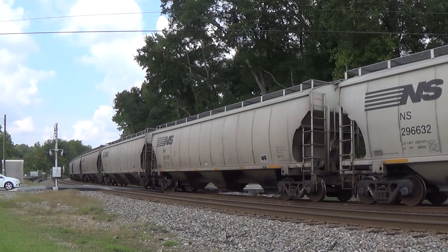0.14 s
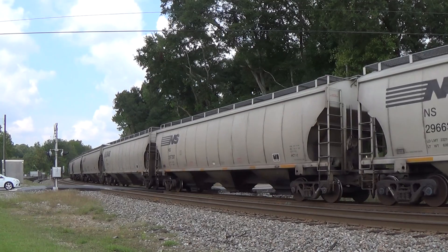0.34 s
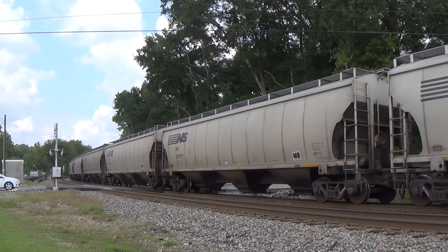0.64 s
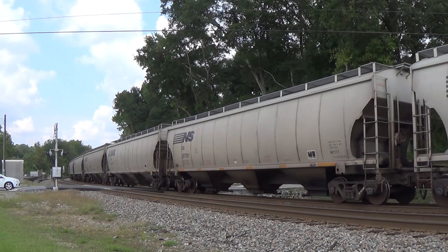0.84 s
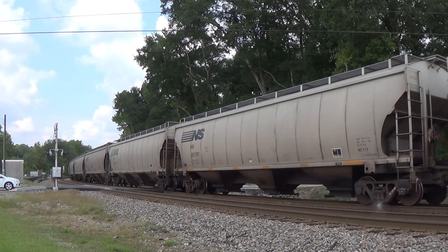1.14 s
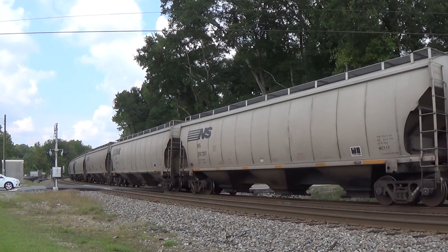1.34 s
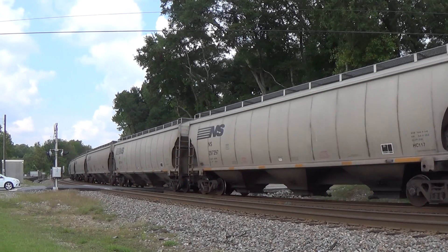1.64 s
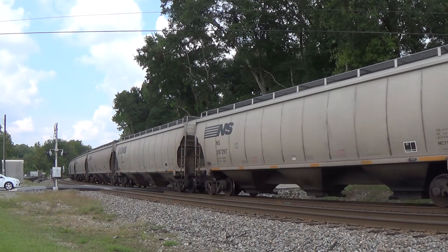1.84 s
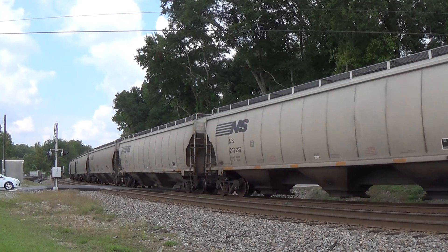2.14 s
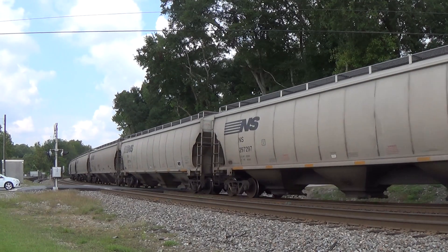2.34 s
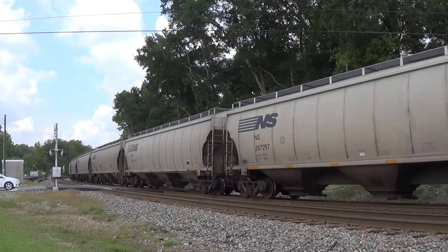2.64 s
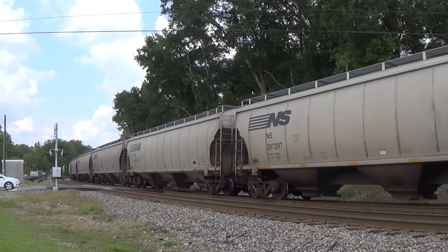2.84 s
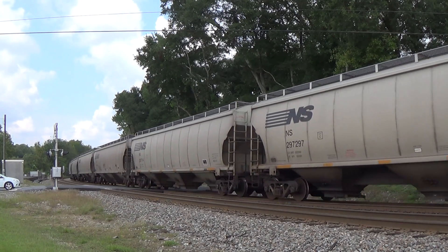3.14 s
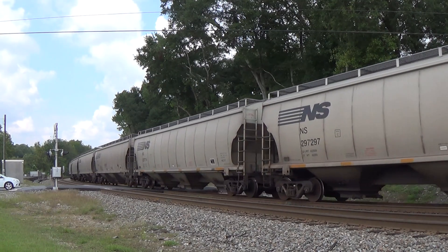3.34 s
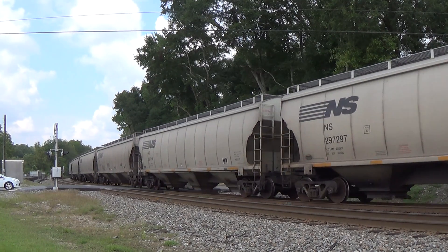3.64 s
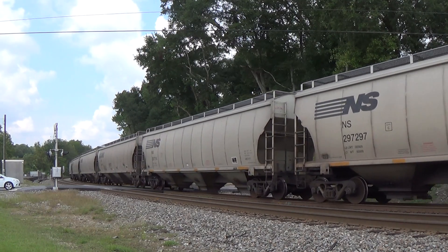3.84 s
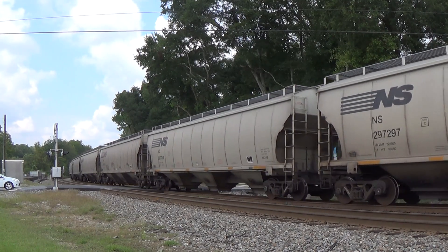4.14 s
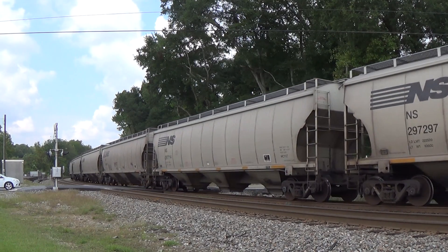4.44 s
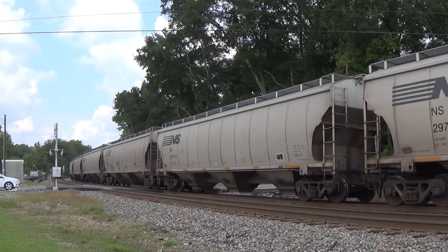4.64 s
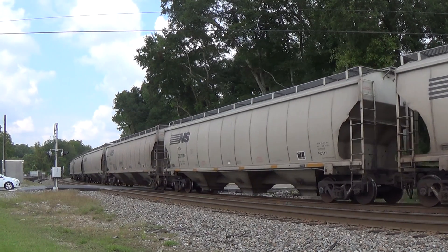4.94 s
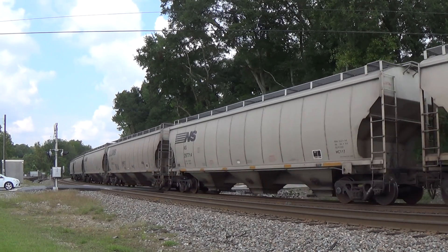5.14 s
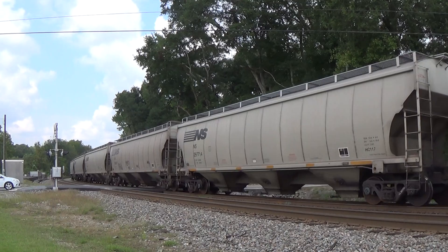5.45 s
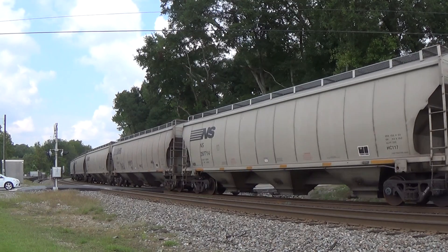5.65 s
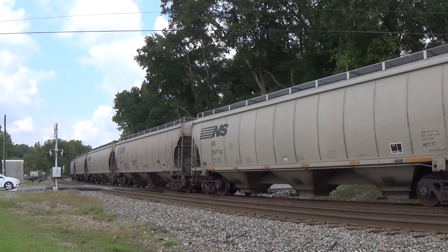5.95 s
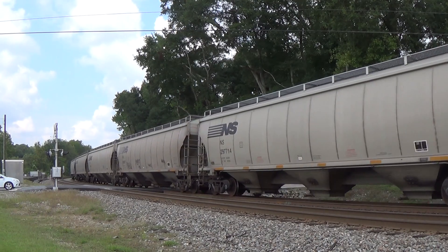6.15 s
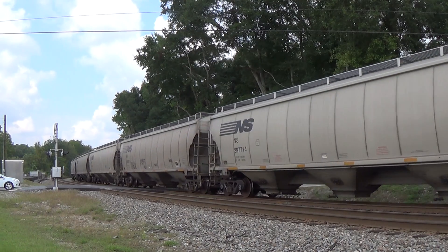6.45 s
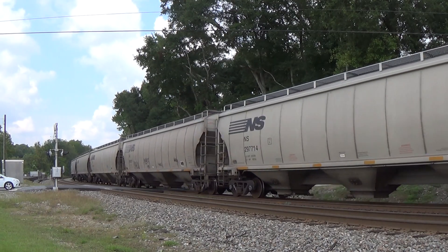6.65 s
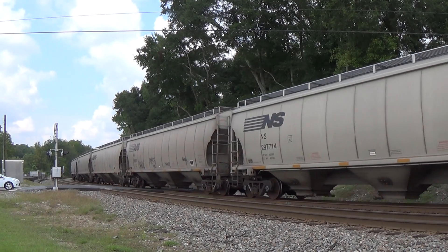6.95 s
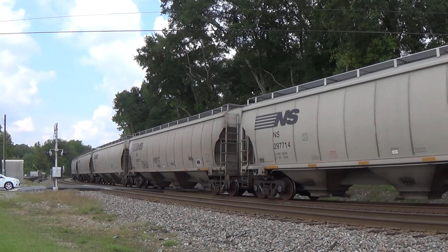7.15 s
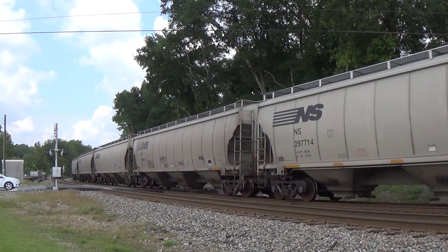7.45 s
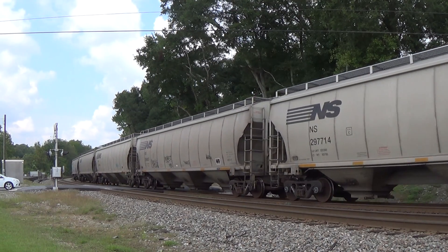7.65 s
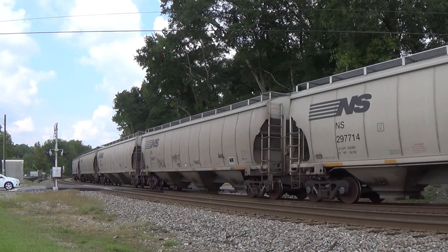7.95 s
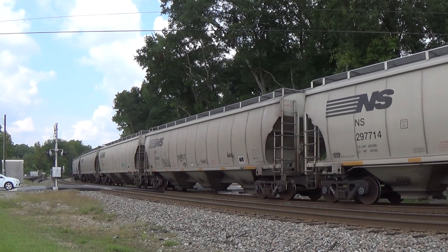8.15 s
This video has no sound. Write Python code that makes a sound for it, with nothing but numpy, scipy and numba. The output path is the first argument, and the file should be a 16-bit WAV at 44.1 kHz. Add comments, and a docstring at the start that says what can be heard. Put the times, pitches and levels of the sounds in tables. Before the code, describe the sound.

Heard from about ten metres off an outdoor track, freight cars pass slowly with shrill, overlapping wheel squeals and a steady metallic grinding hiss. Underneath, the car bodies rumble and the rail hums faintly. Irregular thuds with short rattles join in as wheels cross rail joints, growing heavier while the squealing eases. The rolling rumble builds toward the end.

```python
"""A slow freight train of hopper cars passes, drifting to the right. From the start, flanges grind on
the rail and ring the steel wheels, and single wheel modes break into squeals over rumbling car bodies
and a faint rail hum. From 2.2 s the cars knock over the rail joints. At 3 s the grinding truck goes by,
ten metres away, its ringing and squeals gliding down in pitch. Then the squeals thin out, the knocks
hit harder until the last at 7.2 s, and the rumble swells to the end."""
import sys
import numpy as np
from scipy import signal
from scipy.fft import rfft, irfft, next_fast_len
from scipy.io import wavfile
from scipy.ndimage import uniform_filter1d
from numba import njit

SR = 44100
rng = np.random.default_rng(int(sys.argv[2]) if len(sys.argv) > 2 else 0)


def master(y):
    """Save y as 16-bit WAV."""
    cut = np.clip(np.atleast_2d(y).T, -1, 1)
    pcm = np.round(cut * 32767)  # scale
    wavfile.write(sys.argv[1], SR, pcm.astype(np.int16))


N = 366030
TIME = np.arange(N) / SR
STAGES_S = (1., 3.7, 6.8)  # the grinding truck approaches, passes, recedes


def undb(db):
    """dB to gain."""
    return 10 ** (np.asarray(db) / 20)


def unit(x):
    """Scale to rms 1."""
    return x / np.sqrt(np.mean(x ** 2))


def automation(table):
    """One curve for each column after the time column."""
    times, *columns = np.transpose(table)
    return [np.interp(TIME, times, column) for column in columns]


def staged(values):
    """A curve through one value for each stage of the pass."""
    return np.interp(TIME, STAGES_S, values)


def on_hz(table, hz):
    """Read (frequency, value) points on a log axis."""
    freqs, values = np.transpose(table)
    return np.interp(np.log(hz + 1), np.log(freqs), values)


def shape(x, gain):
    """Filter by a gain that is a function of Hz."""
    size = next_fast_len(N)
    return irfft(rfft(x, size) * gain(np.arange(size // 2 + 1) * SR / size), size)[..., :N]


def eq(x, table):
    """Filter by a curve of (f/Hz, level/dB) points."""
    return shape(x, lambda hz: undb(on_hz(table, hz)))


def split(x, edges_hz):
    """Crossover: bands that add up to x."""
    lows = [shape(x, lambda hz: 1 / (1 + (hz / edge) ** 8)) for edge in edges_hz]
    return np.diff([0 * x] + lows + [x], axis=0)


def wander(rate_hz):
    """Smooth random modulator with a spread near 1."""
    hold = int(SR / rate_hz)
    steps = np.repeat(rng.standard_normal(N // hold + 1), hold)
    return 0.93 * uniform_filter1d(uniform_filter1d(steps, hold), hold)[:N]


@njit
def resonator(x, hz, width_hz):
    """State-variable band-pass with a slowly moving centre and width, gain 1 at the centre."""
    y = np.empty(len(x))
    band_state, low_state, tuning, damping = 0., 0., 0., 0.
    for i in range(len(x)):
        if i % 64 == 0:
            tuning, damping = np.tan(np.pi * hz[i] / SR), width_hz[i] / hz[i]
        band = (band_state + tuning * (x[i] - low_state)) / (1 + tuning * (tuning + damping))
        band_state = 2 * band - band_state
        low_state += 2 * tuning * band
        y[i] = damping * band
    return y


def ring(x, modes):
    """Drive a bank of fixed resonances with x."""
    return sum(undb(db) * resonator(x, np.full(N, float(hz)), np.full(N, float(width)))
               for hz, width, db in modes)


def doppler(speed_m_s=4., nearest_s=3., nearest_m=10., sound_m_s=343.):
    """Pitch ratio of the truck rolling by on a straight track."""
    along_m = speed_m_s * (TIME - nearest_s)
    return 1 - speed_m_s / sound_m_s * along_m / np.hypot(along_m, nearest_m)


# Wheel modes at rest: f/Hz
WHEEL_HZ = [964.0, 1568.0, 1944.0, 2208.0, 2572.0, 2752.0, 3348.0, 3544.0, 3860.0, 3980.0, 4484.0, 5336.0,
            5452.0, 5728.0, 6052.0, 6268.0, 6420.0, 6900.0, 7200.0, 7388.0, 8116.0, 8364.0, 9032.0, 9336.0,
            9924.0, 10312.0, 10800.0, 11264.0, 11696.0, 12424.0]
# Their balance, a row a mode: approaching level/dB, passing level/dB, receding level/dB
WHEEL_DB = [(-56, -50, -63), (-43.5, -43.5, -47.5), (-41, -43.5, -43), (-39.5, -35.5, -43),
            (-41.5, -45, -43.5), (-38.5, -36, -39.5), (-43, -39, -45.5), (-38.5, -43.5, -50.5),
            (-37, -40.5, -59), (-42.5, -39.5, -44), (-35, -36.5, -42.5), (-41, -42.5, -51),
            (-37.5, -36.5, -42.5), (-42, -39, -59), (-41, -42, -49), (-41, -38, -57), (-34, -38.5, -42),
            (-54, -42, -70), (-40.5, -34, -44.5), (-31, -35.5, -43), (-33, -41.5, -39), (-31.5, -55, -42),
            (-32, -45, -38.5), (-28, -59, -43), (-34, -42.5, -39), (-35.5, -44, -46), (-39, -35.5, -41.5),
            (-33, -67, -43), (-59, -33.5, -48), (-55, -31.5, -42)]


def wheel_ring(glide, flicker_db=3.5, rub_db=(2.5, -2, 4), width_at_4k_hz=(40., 38., 55.)):
    """Rubbing flanges drive every wheel mode; each catches and lets go on its own."""
    tones = 0
    for hz, levels_db in zip(WHEEL_HZ, WHEEL_DB):
        # higher modes lose energy faster; late in the pass more wheels share and widen each mode
        width = staged(width_at_4k_hz) * (hz / 4000) ** 0.4
        mode = resonator(rng.standard_normal(N), hz * glide, width)
        mode /= np.sqrt(np.pi * width / SR)  # make up the power lost in the band-pass
        tilt = (hz / 4000) ** 0.08
        tones += undb(staged(levels_db) + flicker_db * wander(14)) * tilt * mode
    # below the first radial mode the wheel radiates poorly
    return undb(staged(rub_db)) * shape(tones, lambda hz: hz ** 6 / (hz ** 6 + 1030. ** 6))


def fittings(count=220, lift_db=8., width_hz=45.):
    """Many small steel parts resonate at random pitches: their gain as a function of Hz."""
    centres = rng.uniform(1500, 16000, count)
    heights = undb(lift_db * rng.random(count))
    grid = np.arange(0, SR / 2, 10.)
    comb = 1 + sum(height / (1 + (2 * (grid - centre) / width_hz) ** 2)
                   for centre, height in zip(centres, heights))
    return lambda hz: np.interp(hz, grid, comb)


# Tone of the hiss: f/Hz, level/dB
HISS_EQ = [(1100, -23), (1500, -6), (1700, -0.5), (2300, -2.5), (3200, 0), (5000, -2), (9000, -1.5),
           (12000, 2), (14000, -3), (16000, -8)]
# Its band faders: t/s, level/dB below 5 kHz, level/dB at 5-10 kHz, level/dB above 10 kHz
HISS_FADERS = [(0.0, -27, -23, -24.5), (1.0, -26.5, -26.5, -25), (1.9, -25, -27, -31), (2.6, -27, -26, -32),
               (3.0, -29, -30, -30), (3.75, -27.5, -28.5, -26), (4.3, -27, -27, -28),
               (5.45, -23.5, -24, -28), (6.3, -26.5, -26.5, -29), (7.2, -25, -25, -27),
               (8.3, -29.5, -23.5, -27)]


def flange_hiss(steel_colour, trim_db=-5.):
    """Rough contact of flange and rail hisses, coloured by the steel fittings."""
    hiss = shape(rng.standard_normal(N), lambda hz: undb(on_hz(HISS_EQ, hz)) * steel_colour(hz))
    bands = split(hiss, edges_hz=(5000, 10000))
    return sum(undb(db + trim_db) * unit(band) for db, band in zip(automation(HISS_FADERS), bands))


def chirps(count=150, length_s=(0.087, 0.25), lift_db=2.5, cap_db=-37., detune=0.004):
    """Cues for faint, short squeals on any wheel mode at any moment."""
    cues = []
    for when, which, how_long, offset in rng.random((count, 4)):
        start, mode = when * N / SR, int(which * len(WHEEL_HZ))
        hz = WHEEL_HZ[mode] * (1 + detune * (2 * offset - 1))
        db = min(np.interp(start, STAGES_S, WHEEL_DB[mode]) + lift_db, cap_db)
        cues.append((start, np.interp(how_long, (0, 1), length_s), hz, db))
    return cues


# Featured squeals: t/s, length/s, f/Hz at rest, level/dB before trim and swell
SQUEAL_CUES = [(0.0, 0.17, 8365, -28), (0.0, 0.23, 9334, -24), (0.0, 0.35, 5452, -34),
               (0.0, 0.38, 7392, -22), (0.09, 0.1, 3543, -32), (0.12, 0.3, 3365, -35),
               (0.15, 0.2, 4486, -36), (0.68, 0.32, 5452, -34), (0.15, 0.58, 9033, -27),
               (0.33, 0.18, 8125, -30), (0.38, 0.12, 7392, -26), (0.4, 0.76, 8362, -27),
               (0.44, 0.3, 6419, -33), (0.47, 0.42, 2196, -34), (0.65, 0.11, 7395, -29),
               (0.73, 0.19, 9033, -29), (0.77, 0.26, 7389, -26), (0.83, 0.17, 11263, -30),
               (0.85, 0.34, 6421, -29), (0.89, 0.38, 4483, -35), (1.03, 0.28, 7389, -23),
               (1.1, 0.13, 11266, -32), (1.16, 0.38, 8362, -31), (1.19, 0.23, 6421, -28),
               (1.31, 0.28, 4486, -34), (1.31, 0.39, 7389, -22), (1.42, 0.26, 6421, -29),
               (1.44, 0.19, 9034, -28), (1.46, 0.41, 9332, -30), (1.63, 0.29, 9034, -32),
               (1.68, 0.22, 6421, -33), (1.7, 0.4, 7389, -23), (1.84, 0.55, 6271, -34),
               (1.9, 0.32, 6421, -31), (2.0, 0.42, 4544, -36), (2.1, 0.16, 7389, -24),
               (2.26, 0.76, 7389, -27), (2.78, 0.36, 5337, -33), (2.81, 0.15, 4456, -34),
               (2.96, 0.35, 4456, -36), (3.02, 0.34, 7389, -34), (3.28, 0.59, 7393, -31),
               (3.4, 0.25, 5452, -35), (3.36, 0.36, 9333, -36), (3.65, 0.33, 5452, -33),
               (3.68, 0.52, 12417, -31), (3.78, 0.55, 9036, -36), (3.87, 0.36, 7393, -34),
               (3.29, 0.27, 9924, -38), (3.78, 0.4, 9935, -37), (3.86, 0.25, 10798, -36),
               (3.83, 0.37, 8130, -37), (2.4, 0.4, 4482, -36), (2.56, 0.42, 9094, -38),
               (4.36, 0.1, 10797, -36), (4.2, 0.25, 9921, -35), (4.21, 0.26, 3345, -36),
               (4.13, 0.38, 2742, -37), (4.33, 0.42, 9036, -37), (5.4, 0.45, 9025, -38),
               (5.45, 0.31, 3986, -36), (5.62, 0.09, 2737, -34), (6.96, 0.2, 4458, -36),
               (4.25, 0.6, 5328, -35), (4.37, 0.34, 7202, -34), (4.78, 0.38, 7388, -36),
               (4.78, 0.48, 9060, -35), (5.2, 0.1, 9912, -34), (5.58, 0.33, 6906, -34),
               (5.66, 0.31, 8116, -35), (6.04, 0.5, 4588, -33), (6.05, 0.37, 4467, -35),
               (6.06, 0.19, 3982, -33), (6.08, 0.25, 1853, -33), (6.18, 0.32, 2172, -35),
               (6.2, 0.15, 7954, -35), (6.2, 0.4, 3138, -35), (6.25, 0.3, 3982, -32),
               (6.34, 0.47, 9072, -36), (6.55, 0.36, 8167, -35), (6.82, 0.18, 3974, -32),
               (7.03, 0.4, 2163, -36), (7.65, 0.6, 1571, -41), (7.65, 0.22, 2734, -35),
               (7.81, 0.4, 8108, -32)]


def squeals(glide, trim_db=-0.6, roughness=0.42, waver_hz=50., ramp_s=0.047, swell_db=5.5):
    """Stick-slip locks on to one wheel mode: a wavering tone that swells and fades."""
    out = np.zeros(N)
    waver = wander(waver_hz) + 1j * wander(waver_hz)  # moves both level and phase
    glide_time = np.cumsum(glide) / SR
    for start, length, hz, db in SQUEAL_CUES + chirps():
        end = start + length
        span = np.arange(int(max(start - ramp_s / 2, 0) * SR), min(int((end + ramp_s / 2) * SR), N))
        inside_s = np.minimum(TIME[span] - start, end - TIME[span])
        fade = np.clip(inside_s / ramp_s + 0.5, 0, 1)
        swell = undb(swell_db * (2 * inside_s / length - 0.5))
        own_waver = waver[(span + int(hz) * 997) % N]  # each pitch wavers its own way
        tone = (1 + roughness * own_waver) * np.exp(2j * np.pi * hz * glide_time[span])
        out[span] += np.sqrt(2) * undb(db + trim_db) * fade * swell * tone.real
    return out


# Low modes of the hopper body, rung by rolling and by knocks: f/Hz, width/Hz, level/dB
BODY_MODES = [(128, 33, -2.5), (191.4, 14.5, 3), (265, 64, -2.5), (340.3, 8, 6.5)]
# Tone of the low end that shakes the body: f/Hz, level/dB
RUMBLE_EQ = [(15, -41), (25, -21), (64, 9), (118, -1), (193, -2.5), (279, -12.5), (336, -9.5), (400, -22),
             (520, -38), (880, -120)]
# Tone of the rail's roar: f/Hz, level/dB
ROAR_EQ = [(150, -24), (300, -7), (500, -1), (900, -0.5), (1400, 1.5), (2200, -35), (4000, -44)]
# Faders of the rolling bed: t/s, thrum level/dB, rumble level/dB, roar level/dB
ROLL_FADERS = [(0.0, -56, -50, -45), (0.5, -52, -45.5, -43), (1.3, -59, -50, -43.5), (2.1, -56, -53.5, -46),
               (2.9, -61, -59, -52), (3.3, -61, -51.5, -48.5), (4.1, -62, -50.5, -48),
               (4.95, -49, -54, -43.5), (5.5, -51, -44.5, -39), (6.15, -55.5, -51.5, -39.5),
               (7.1, -47.5, -43.5, -37.5), (7.5, -46, -42.5, -39), (8.3, -42.5, -40, -39.5)]


def rolling(flutter_db=2.95):
    """Rolling wheels make the ground thrum, the car bodies rumble and the rail roar."""
    shake = eq(rng.standard_normal(N), RUMBLE_EQ)
    thrum, rumble = split(shake + 1.5 * ring(shake, BODY_MODES), edges_hz=[110])
    roar = eq(rng.standard_normal(N), ROAR_EQ)
    return sum(undb(db + flutter_db * wander(9)) * unit(layer)
               for db, layer in zip(automation(ROLL_FADERS), (thrum, rumble, roar)))


def rail_hum(glide, hz=965, width_hz=16, stage_db=(-48.5, -64, -50), drift_db=1.5):
    """The rail rings faintly between its sleepers."""
    hum = resonator(rng.standard_normal(N), hz * glide, np.full(N, width_hz))
    return undb(staged(stage_db) + drift_db * wander(3)) * unit(hum)


# Modes of the hopper's sheet walls: f/Hz, width/Hz, level/dB
PANEL_MODES = [(434, 122, 11), (600, 140, 3), (740, 200, -34), (1010, 370, -20)]
# Rail-joint hits: t/s, level/dB before boosts, thud f/Hz, panel send level/dB, rattle decay/s
KNOCK_CUES = [(2.237, -32, 178, -9, 0.28), (3.119, -28.5, 127, -7.5, 0.26), (3.236, -30, 207, -14, 0.22),
              (3.33, -32.5, 215, -8, 0.27), (3.544, -29.5, 135, -10, 0.22), (3.701, -27.5, 213, -10.5, 0.2),
              (3.775, -31.5, 221, -16, 0.17), (3.841, -33, 142, -16, 0.18), (4.03, -35, 213, -14, 0.18),
              (4.106, -36, 221, -9, 0.19), (4.507, -27, 213, -19, 0.29), (4.902, -21, 193, -28, 0.23),
              (5.355, -22.5, 190, -10, 0.26), (5.580, -23, 188, -10.5, 0.28),
              (6.547, -21.5, 434, -0.5, 0.11), (6.775, -21, 444, -2.5, 0.14), (7.151, -22, 600, -6.5, 0.27)]


def knocks(thud_cycles=8.3, thud_boost_db=5., rattle_boost_db=9., body_boost_db=6.5, attack_s=0.003):
    """A wheel hits a rail joint: a compact thud, then a loose rattle in body and panels."""
    thuds, body_send, panel_send = np.zeros((3, N))
    t = TIME[:int(0.4 * SR)]
    attack = np.sin(np.pi / 2 * np.minimum(t / attack_s, 1)) ** 2
    for start, db, hz, panel_db, rattle_s in KNOCK_CUES:
        thud_decay = undb(-60 * t * hz / thud_cycles)
        rattle_decay = undb(-60 * t / rattle_s)
        rattle = undb(db + rattle_boost_db) * attack * rattle_decay * rng.standard_normal(len(t))
        span = int(start * SR) + np.arange(len(t))
        thuds[span] += undb(db + thud_boost_db) * attack * thud_decay * np.sin(2 * np.pi * hz * t)
        body_send[span] += rattle
        panel_send[span] += undb(panel_db) * rattle
    body = shape(ring(body_send, BODY_MODES), lambda hz: 1 / (1 + (hz / 374.) ** 4))
    hopper = thuds + undb(body_boost_db) * body + ring(panel_send, PANEL_MODES)
    # a car body is too small to radiate the deepest bass
    return shape(hopper, lambda hz: hz ** 4 / (hz ** 4 + 82. ** 4))


# Pan moves, scaled by the two depth curves below: t/s, left-over-right level/dB,
# left phase lead/rad, treble left-over-right level/dB, spread level/dB
PAN_MOVES = [(0.0, -0.5, 0.23, 0, -6.5), (1.6, -3, 0.23, -3, -3), (2.3, -4, 0.51, -6.5, -2),
             (2.9, -5, 0.38, -4.5, 3), (3.35, -6.5, 0.53, 4, 5), (4.15, -6, 0.92, 2.5, 0.5),
             (5.2, -4, 1, 2.5, -0.5), (6.6, -5.5, 0.92, 2.5, 0), (8.3, -3, 1, 1.5, -5)]
# Depth of the main pan, strongest in the mids: f/Hz, gain
PAN_DEPTH = [(100, .03), (300, 0.25), (700, 0.68), (1400, 1), (4000, 1.34), (7000, 0.77), (9500, 0.033),
             (15000, 0.013)]
# Depth of the treble pan: f/Hz, gain
TREBLE_PAN_DEPTH = [(6000, 0.01), (8500, 0.9), (11000, 1.25), (13000, 0.12), (16000, .1)]
# Tone of the stereo spread: f/Hz, level/dB
SPREAD_EQ = [(60, -26), (250, -18), (600, -10), (1400, -8), (4000, -16.5), (8000, -2.5), (11000, -13),
             (15000, -82)]


def stereo_pass(mid, diffuse):
    """The train's direction sets a level and a phase difference between left and right."""
    pan_db, lead_rad, treble_db, spread_db = automation(PAN_MOVES)
    # side over mid for a given complex ratio of left to right
    steer = np.tanh((np.log(undb(pan_db)) + 1j * lead_rad) / 2)
    treble_steer = np.tanh(np.log(undb(treble_db)) / 2)
    in_phase = shape(mid, lambda hz: on_hz(PAN_DEPTH, hz))
    quarter_ahead = shape(mid, lambda hz: 1j * on_hz(PAN_DEPTH, hz))
    treble = shape(mid, lambda hz: on_hz(TREBLE_PAN_DEPTH, hz))
    # far off the grinding is a point, close by it spreads along the car
    spread = undb(spread_db) * eq(diffuse, SPREAD_EQ)
    side = spread + steer.real * in_phase + steer.imag * quarter_ahead + treble_steer * treble
    return np.array([mid + side, mid - side])


def scene():
    """A wide bed of grinding and rolling, with knocks and squeals as point sources on top."""
    glide, steel_colour = doppler(), fittings()
    # many wheels share one timbre: two unrelated beds, one for the centre and one for width
    centre, diffuse = [wheel_ring(glide) + flange_hiss(steel_colour) + rolling() + rail_hum(glide)
                       for _ in range(2)]
    return stereo_pass(centre + knocks() + squeals(glide), diffuse)


def record(dry, ceiling=0.57, top_hz=15950):
    """Soft clipping rounds the loudest peaks and a steep low-pass cuts the top."""
    rounded = ceiling * np.tanh(dry / ceiling)
    return signal.sosfilt(signal.ellip(14, 0.2, 100, top_hz, fs=SR, output="sos"), rounded)


dry = scene()
out = record(dry)
master(out)
```